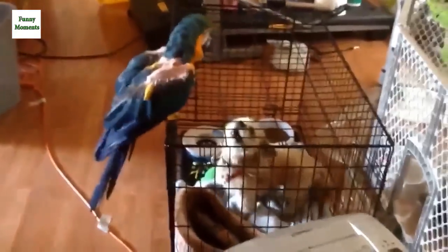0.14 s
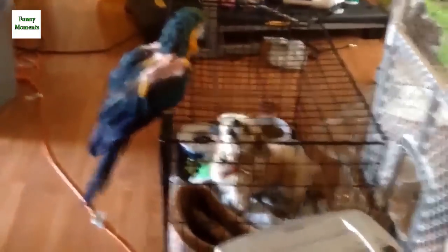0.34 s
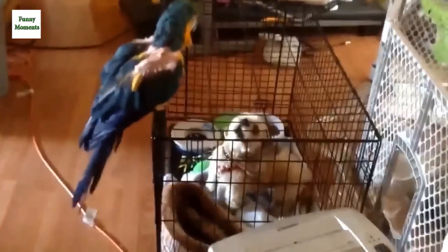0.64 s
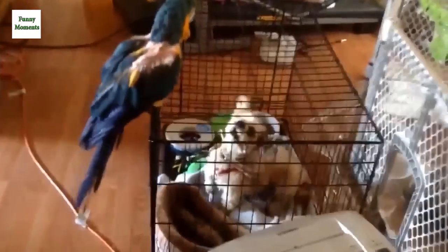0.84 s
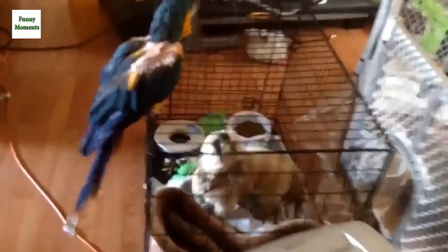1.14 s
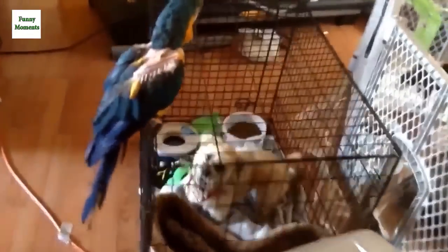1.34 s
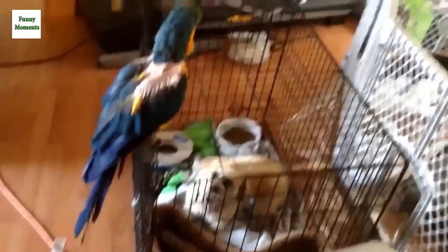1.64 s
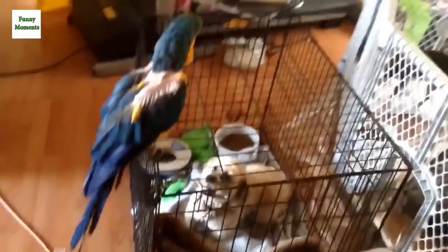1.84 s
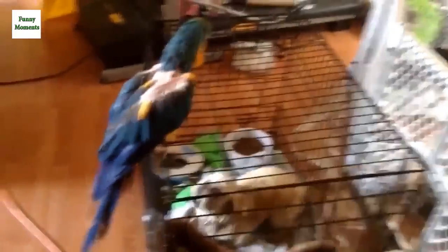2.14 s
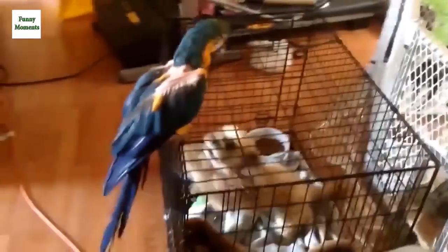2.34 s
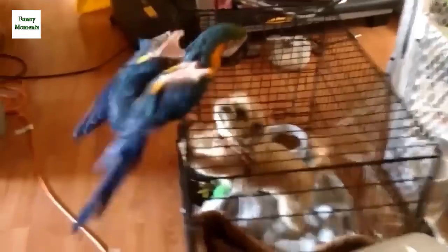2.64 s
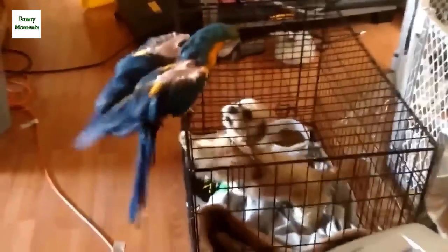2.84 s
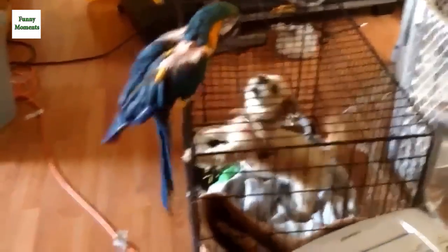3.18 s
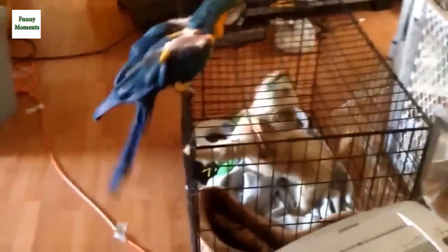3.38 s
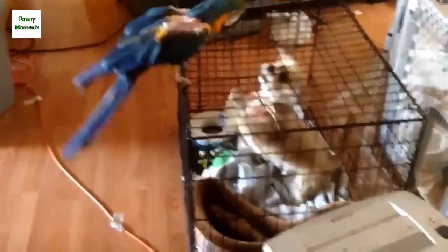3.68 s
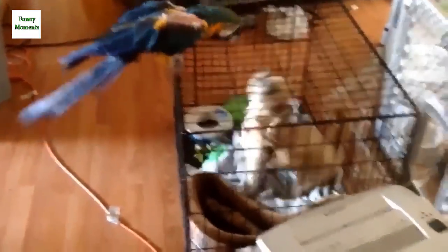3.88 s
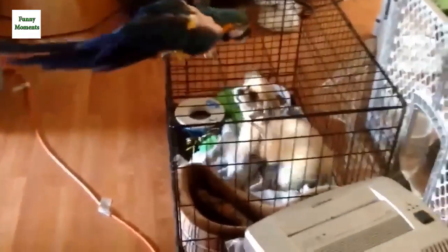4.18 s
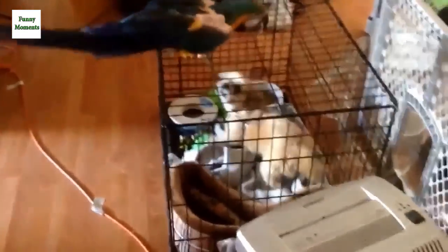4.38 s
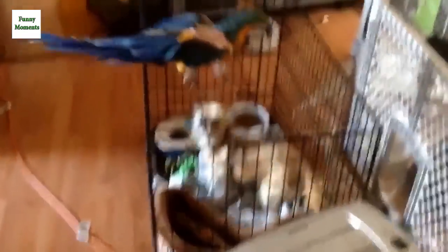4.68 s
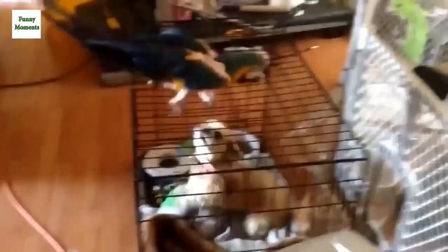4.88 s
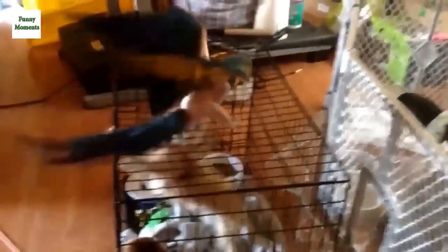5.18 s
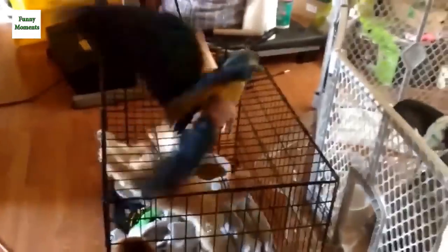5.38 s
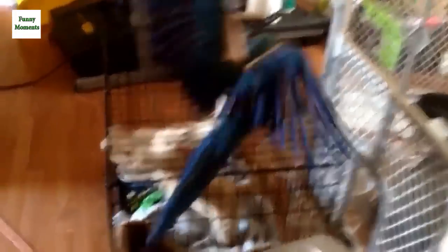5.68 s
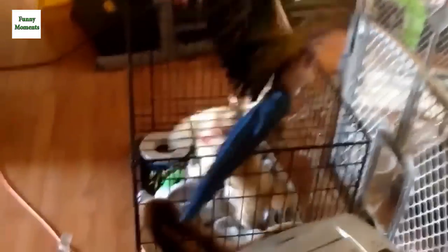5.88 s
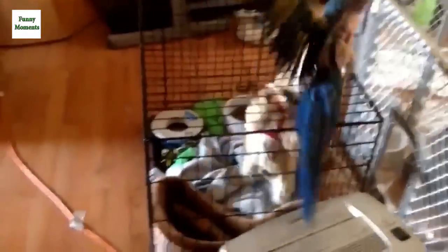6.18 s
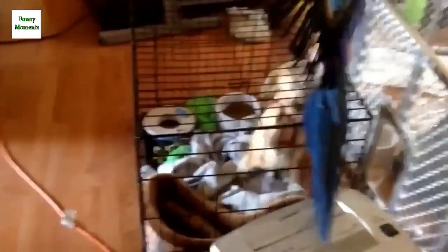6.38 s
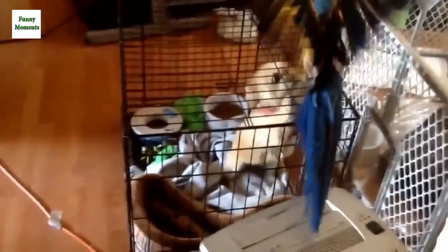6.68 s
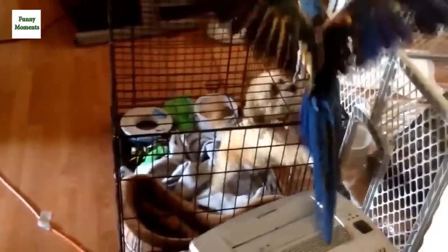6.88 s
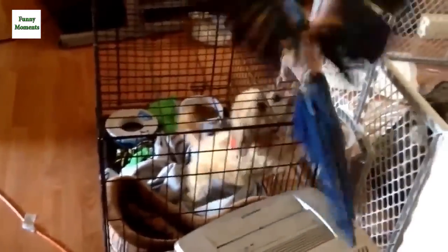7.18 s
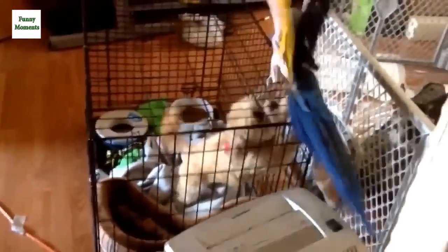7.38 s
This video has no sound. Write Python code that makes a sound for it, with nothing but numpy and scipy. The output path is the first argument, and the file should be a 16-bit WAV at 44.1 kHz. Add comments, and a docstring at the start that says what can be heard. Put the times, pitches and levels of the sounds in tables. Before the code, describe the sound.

Indoors, high, breathy barks from a small dog come about twice a second, pausing briefly for a single falling, raspy macaw squawk. The barks then give way to softer scrambling: crate wire clatters and jingles, feathers and bedding rustle, and the dog gives two low grumbles near the end. The room adds a short echo, and a small microphone cuts the bass and squashes the loudest barks.

```python
"""A small dog yaps from a wire crate in a hard-floored room; each bark is a puff of air and a yelp.
A macaw perched on the rim answers with one call that turns raspy and slides down.
Then both scramble about: bedding and feathers rustle, the wire knocks and jingles, and the dog
grumbles low with its mouth closed. Underneath lie a faint hum and a hiss that rises and dips.
A small microphone cuts the bass and squashes the loudest barks."""
import sys
import numpy as np
from scipy import signal
from scipy.fft import rfft, irfft
from scipy.io import wavfile
from scipy.ndimage import uniform_filter1d, minimum_filter1d

SR = 44100
rng = np.random.default_rng(int(sys.argv[2]) if len(sys.argv) > 2 else 0)


def to_wav(s):
    """Save 16-bit WAV."""
    ch = np.atleast_2d(s).T  # columns
    pcm = np.round(np.clip(ch, -1, 1) * 32767)  # PCM
    wavfile.write(sys.argv[1], SR, pcm.astype(np.int16))


N = 332073
CUTOFF_HZ = 15760   # where the treble ends


def dog():
    """The dog's voice: sharp barks, then low grumbles."""
    # each bark: (start [s], rise [s], fall [s], yelp pitch [Hz], pitch after the break [Hz],
    # crest [dB], level after the break [dB], first air [dB], full puff of air [dB],
    # mouth opening [dB], rasp [dB], roughness [0-1])
    barks = [(0.06, .042, 0.077, 1030, 690, -4, -14.5, -20.5, -23, 2, 7, .4),
             (0.52, 0.062, .06, 1113, 764, -3.5, -23, -20.5, -19, -0.5, 2.5, 0.47),
             (1.178, 0.047, 0.084, 886.7, 695, -5, -14, -44, -19.5, -5, 0, 0.45),
             (2.238, .062, 0.067, 1010, 674, -14.5, -13, -34.5, -12.5, 3, 1.5, 0.31),
             (2.55, .05, 0.086, 971.4, 734, -8.5, -14, -44, -20, 2.5, 0, 0.26),
             (3.02, .078, 0.051, 930, 823, -4.5, -21, -37, -20.5, -0.5, 3, 0.4),
             (3.45, 0.0739, 0.1037, 960, 979.3, -7.5, -15.5, -29.5, -20.5, 0, -0.5, 0.36),
             (3.872, .09, 0.047, 943, 817, -8.5, -17.5, -43, -22.5, -2.5, 1.5, 0.43)]
    # one list for each grumble: (time [s], pitch [Hz], level [dB], roughness [0-1])
    grumbles = [
        [(6.015, 266, -41, 0.42), (6.057, 264.7, -38, 0.41), (6.12, 327, -62, 0.54)],
        [(6.545, 402.3, -27.5, 0.08), (6.583, 375.4, -32.5, 0.28), (6.609, 283.4, -41.5, 0.53),
         (6.775, 289.1, -36.5, 0.32), (6.855, 319, -38, 0.36), (6.885, 353.8, -34, 0.17),
         (6.935, 336.7, -32.5, 0.26), (6.965, 348.3, -42, 0.57), (7.03, 288, -54, 0.6)],
    ]
    return sum(bark(*row) for row in barks) + sum(grumble(rows) for rows in grumbles)


def bark(start, rise, fall, yelp_hz, broken_hz, crest_db, broken_db,
         first_air_db, puff_db, open_db, rasp_db, rough):
    """Air puffs out, a yelp swells to its crest, then the pitch breaks, mostly downward, and falls."""
    # how the mouth shapes the tone: (frequency [Hz], level [dB])
    mouth = [(150, -43), (450, -16), (700, 2), (980, 10), (1450, -1), (2000, -7.5), (2500, -8),
             (2950, -24.5), (3600, -29), (5100, -25.5), (6100, -33), (15000, -30.5)]
    # the hiss of the breath: (frequency [Hz], level [dB per Hz])
    breath = [(88, -55), (150, -44.5), (205, -21), (510, -21), (573, -9), (782, -11), (1010, -2),
              (1430, -15.5), (1540, -4.5), (3930, -27), (4770, -29), (10400, -23), (13900, -33.5),
              (15600, -56.5)]
    crest = start + rise
    # five moments: a faint start, the puff, the crest, the break, the end
    times = [start, start + 0.4505 * rise, crest, crest + 0.018, crest + fall]
    hz = [0.92 * yelp_hz, yelp_hz, yelp_hz, broken_hz, 0.94 * broken_hz]
    level_db = np.array([crest_db - 28, crest_db - 13.5, crest_db, broken_db, broken_db - 11.5])
    air_db = np.array([first_air_db, puff_db, puff_db - 4, puff_db - 16.5, puff_db - 25])
    roughness = rough + np.array([0, 0, 0.1, 0.1, 0.2])
    half_pitch = np.full(len(times), 0.44)
    return voice(times, [hz, level_db, air_db - level_db, roughness, half_pitch],
                 open_mouth(mouth, open_db, rasp_db), open_mouth(breath, open_db, rasp_db),
                 wobble=0.0668, hoarse=1.0, flutter_db=2.5, fade_s=0.011)


def open_mouth(spectrum, open_db, rasp_db):
    """A wider mouth lifts the middle of the sound; rasp lifts the band above it."""
    return [(hz, db + open_db * (1300 < hz < 3100) + rasp_db * (3500 < hz < 5500)) for hz, db in spectrum]


def grumble(rows):
    """A closed-mouth murmur; the rougher it is, the more air and half pitch it carries."""
    # how the closed mouth muffles tone and breath: (frequency [Hz], level [dB])
    closed_mouth = [(88, -35), (150, -6), (318, 12), (566, 8.5), (1140, -1), (1910, -30), (3000, -31),
                    (3900, -13), (6600, -120)]
    times, hz, level_db, rough = np.transpose(rows)
    air_db = -25 + 56 * rough
    half_pitch = 0.56 * rough
    return voice(times, [hz, level_db, air_db, rough, half_pitch], closed_mouth, closed_mouth,
                 wobble=0.111, hoarse=0.84, flutter_db=2.0, fade_s=0.0032)


def macaw(slide_from_s=1.74, slide_to_s=1.95, slide_fade_s=0.057):
    """Returns the call, clear and then raspy, and two low tones that stay pure as it slides down."""
    # the course of the call: (time [s], pitch [Hz], level [dB])
    melody = [(1.35, 577, -48), (1.401, 639, -32), (1.5, 696.6, -27), (1.601, 720.7, -24.5),
              (1.7, 702.3, -21.5), (1.76, 632.5, -28.5), (1.81, 561.5, -27), (1.86, 394.5, -41.5),
              (1.916, 218, -53), (1.97, 180, -58)]
    # how the throat shapes the tone: (frequency [Hz], level [dB])
    throat = [(150, -4), (300, -4), (500, -7), (700, -8), (1000, -12), (1420, 3), (1650, 0), (2000, -8),
              (2450, -10), (2950, 2), (3500, -13), (3900, -18), (5000, -16), (6300, -20), (7000, -28),
              (9500, -24), (11000, -28), (13000, -33), (15500, -46)]
    # the raspy air: (frequency [Hz], level [dB per Hz])
    rasp = [(530, -45), (900, -15.5), (1470, -22.5), (1650, 3.5), (2000, -34.5), (2600, -19), (3000, 0),
            (3580, -9), (4600, -16), (5900, -13), (7000, -16), (9860, -15), (11000, -35), (14300, -40),
            (15500, -93.5)]
    # the pure tones, at the pitch and at twice the pitch: (starting level [dB], change [dB per s])
    pure_tones = [(-30.5, -100), (-25, -115)]
    times, hz, level_db = np.transpose(melody)
    air_db = np.interp(times, [1.64, 1.76], [-51, -8])   # air rushes in after the held note
    rough, half_pitch = np.full(len(times), 0.049), np.zeros(len(times))
    call = voice(times, [hz, level_db, air_db, rough, half_pitch], throat, rasp,
                 wobble=0.072, hoarse=0.065, flutter_db=3.0, fade_s=0.017)
    t = np.arange(N) / SR
    phase = 2 * np.pi * np.cumsum(np.interp(t, times, hz)) / SR
    since = np.clip(t, slide_from_s, slide_to_s) - slide_from_s
    fade = np.clip(np.minimum(t - slide_from_s, slide_to_s - t) / slide_fade_s, 0, 1)
    slide = sum(amp(db + db_per_s * since) * np.sin(k * phase)
                for k, (db, db_per_s) in enumerate(pure_tones, 1))
    return call, np.sqrt(2) * fade * slide


def voice(times, curves, throat, breath, wobble, hoarse, flutter_db, fade_s):
    """Vocal folds buzz and the throat shapes the tone; rough folds waver, skip cycles and leak air."""
    at = np.arange(round(times[0] * SR), round(times[-1] * SR))
    size = len(at)
    hz, level_db, air_db, rough, half_pitch = [np.interp(at / SR, times, curve) for curve in curves]
    waver = 1 + wobble * rough * drift(160.5, size) + 0.0044 * drift(16, size)
    phase = 2 * np.pi * np.cumsum(hz * waver) / SR
    multiples = np.arange(0.5, 40, 0.5)[:, None]
    gains = amp(at_hz(throat, multiples * hz)) * (multiples * hz < CUTOFF_HZ)
    gains[::2] *= half_pitch   # skipping every other cycle adds tones between the overtones
    gains /= np.sqrt(np.sum(gains ** 2, axis=0) / 2)
    flutters = np.array([drift(20.5, size) for _ in range(8)])   # overtones swell and fade unevenly
    gains *= amp(flutter_db * flutters[np.arange(len(gains)) // 2 % 8])
    tone = np.sum(gains * np.sin(multiples * phase + 2 * np.pi * rng.random(multiples.shape)), axis=0)
    tone *= amp(2.36 * rough * drift(120, size))   # strength stumbles from cycle to cycle
    tone = np.sqrt(1 - rough ** 2) * tone + hoarse * rough * shaped_noise(throat, size)
    air = amp(air_db) * shaped_noise(breath, size) * (1 + 0.18 * np.sin(phase))   # puffs with each cycle
    fade = np.clip(np.minimum(at - at[0], at[-1] - at) / (fade_s * SR), 0, 1)
    out = np.zeros(N)
    out[at] = amp(level_db) * fade * (tone + air)
    return out


def knocks(rattle_s=0.023, snap_s=0.0006, tick_s=0.0054, body_db=-12, tick_db=-10):
    """Loose wire panels snap and clatter briefly at each knock, with a bright tick on top."""
    # paws and claws hit the wire: (time [s], level [dB], extra level for the tick [dB])
    hits = [(0.468, -49, -16), (1.153, -51, -2), (1.952, -44, -20), (2.201, -45, -8), (4.111, -28.5, -27),
            (4.4, -25, -5), (4.432, -17.5, -20), (4.708, -39, -18), (4.827, -34, -18), (5.002, -27, -20),
            (5.138, -34, -18), (5.264, -31, 5), (5.309, -10.5, -20), (5.54, -20.5, -21), (6.18, -33, -4),
            (6.304, -43.5, 19), (6.483, -26, -17), (6.664, -27, -17), (7.295, -34, -12), (7.332, -54, -8),
            (7.393, -39, 5), (7.42, -37, 7), (7.465, -38, -1), (7.514, -43, -5)]
    # the clatter of the crate: (frequency [Hz], level [dB per Hz])
    crate = [(88, -40), (150, 7), (485, 5), (971, 8.5), (1150, 14), (1380, 7), (4020, 7.5), (6000, -7),
             (7800, -47), (13200, -120)]
    out, t = np.zeros(N), np.arange(SR // 10) / SR
    for start, level_db, treble_db in hits:
        body = amp(body_db) * shaped_noise(crate, len(t)) * (np.exp(-t / rattle_s) + np.exp(-t / snap_s))
        hiss = filtered(rng.standard_normal(len(t)), 2, 5000, "high")
        tick = amp(tick_db + treble_db) * hiss * np.exp(-t / tick_s)
        i = round(start * SR)
        out[i:i + len(t)] += amp(level_db) * (body + tick)[:N - i]
    return out


def wire_taps(gain_db=-8, spread_db=3.5):
    """Each tap sets the wire ringing, every tone with a strength of its own."""
    # a claw or beak taps the wire: (time [s], level [dB])
    taps = [(2.8938, -31), (4.11, -44), (5.54, -22.5), (5.7137, -30), (6.483, -25.5), (6.6644, -42)]
    # the tones of the wire: (frequency [Hz], level [dB], time to fade by 60 dB [s])
    tones = [(3450, -4, 0.059), (3730, -6.5, 0.094), (4260, -5.5, 0.057), (4950, -8, 0.059)]
    times, level_db = np.transpose(taps)
    luck_db = spread_db * rng.standard_normal((len(taps), len(tones)))
    out = np.zeros(N)
    for k, (hz, tone_db, ring_s) in enumerate(tones):
        clicks = np.zeros(N)
        clicks[np.round(times * SR).astype(int)] = amp(gain_db + level_db + tone_db + luck_db[:, k])
        out += ring(clicks, hz, ring_s)
    return out


def jingles(gain_db=-22, bounces_per_s=500, settle_s=0.024, spread_db=4.5, swing_db=-12, swing_s=0.16):
    """Small metal parts bounce unevenly and ring at each shake, then swing on more softly."""
    # each shake: (time [s], level [dB], extra for middle-sized parts [dB], extra for the largest [dB])
    shakes = [(2.4738, -45, -3, -18), (2.7296, -28, -12, -17), (2.822, -43, -9, -14), (3.3228, -49, 3, -14),
              (3.71, -49.5, -3, -2), (4.1026, -62, -6, -7), (4.1884, -45, -5, -13), (4.3866, -45, -3, -8),
              (4.4744, -40.5, 3, -16), (4.7302, -43, 6.5, -6), (4.9566, -38, -1, -20),
              (5.174, -38, -2, -19), (5.2704, -30, -11, -8), (5.409, -31.5, -1, -11),
              (5.6255, -26, -7, -24), (5.8022, -35, -4, -15), (5.839, -23, -10, -14),
              (6.0645, -32, -8, -20), (6.176, -31.5, -4.5, -28), (6.3071, -27, -2, -25),
              (6.5959, -42.5, 7.5, -14), (6.8613, -23.5, -10.5, -19), (6.975, -16.5, -13.5, -28),
              (7.0994, -43, -8, -2), (7.2505, -50, 14, -17), (7.5233, -24.5, -7, -16)]
    # the tones of the parts: (frequency [Hz], level [dB], time to fade by 60 dB [s])
    tones = [(7150, 0.5, 0.46), (8370, -2.5, 0.073), (8700, -10, 0.051), (8940, -6, 0.088),
             (9140, 1.5, 0.074), (9700, 4, 0.064), (10200, -8, 0.048), (10300, -11, .06),
             (11640, -16, 0.107), (12400, -21, 0.133), (12000, -6, 0.12), (12600, -0.5, 0.072),
             (12440, 3, 0.053), (13070, -6, 0.074), (13200, -21, 0.071), (13500, -22, 0.062),
             (13900, -7, 0.09), (14300, 0, .06)]
    t, out = np.arange(N) / SR, np.zeros(N)
    starts, level_db, middle_db, largest_db = np.transpose(shakes)
    luck_db = spread_db * rng.standard_normal((len(shakes), len(tones)))
    latest = np.searchsorted(starts, t) - 1
    since = np.abs(t - starts[latest])
    shaking = (latest >= 0) * (np.exp(-since / settle_s) + amp(swing_db) * np.exp(-since / swing_s))
    for k, (hz, tone_db, ring_s) in enumerate(tones):
        part_db = largest_db if hz < 7800 else middle_db if hz < 10900 else 0
        bounces = (rng.random(N) < bounces_per_s / SR) * rng.standard_normal(N)
        bounces[np.round(starts * SR).astype(int) + 1] = 1   # every shake opens with a firm hit
        strength = amp(gain_db + level_db + part_db + tone_db + luck_db[:, k])
        out += ring(bounces * shaking * strength[latest], hz, ring_s)
    return out


def hiss_and_rustle(patchy_db=2.0, grit_db=1.5):
    """Background hiss, later with rustling bedding and feathers: low, middle and bright noise flicker."""
    # a faint hiss that rises and dips, later joined by rustling: (time [s], level [dB], treble [dB])
    background = [(0, -62, -57), (.23, -63, -80), (.45, -69, -79), (.9, -73, -88.5), (1.2, -68, -78.5),
                  (1.94, -67, -65), (2.05, -66.5, -84), (2.3, -66.5, -89), (2.55, -51.5, -51),
                  (2.85, -45.5, -44), (3.3, -55, -71), (3.93, -63.5, -69), (4.3, -52.5, -55.5),
                  (4.65, -60, -71), (5.0, -56.5, -54.5), (5.7, -44.5, -42.5), (6.33, -57, -51.5),
                  (6.6, -44, -42.5), (6.8, -52, -46), (7.1, -45.5, -47.5), (7.53, -62.5, -52.5)]
    # the tone of the noise: (frequency [Hz], level [dB per Hz])
    spectrum = [(47, -98), (80, -10.5), (177, -6.5), (680, 2.5), (947, -2.5), (1760, -3.5), (2500, -6),
                (9400, -10.5), (10700, -11.5), (12000, -11.5), (15600, -11.5)]
    # scuffs of paws and sweeps of wings: (start [s], rise [s], middle [dB], low [dB], bright [dB])
    scuffs = [(.965, 0.017, -56.5, -70.5, -88.5), (1.08, .03, -66.5, -62.5, -87),
              (2.40, 0.024, -67, -62, -69), (4.394, 0.035, -42.5, -34, -60),
              (4.671, 0.052, -48, -42.5, -66), (4.82, 0.036, -56, -41.5, -55),
              (4.998, 0.0086, -49, -48, -62), (5.14, 0.037, -57, -41, -63), (5.29, 0.023, -29, -29, -55),
              (5.528, .012, -37, -45.5, -36.5), (5.6, 0.035, -55, -48, -36), (5.8, 0.063, -73, -47, -39),
              (6.015, 0.051, -47.5, -47, -41), (6.4, 0.052, -50, -47, -42.5), (6.85, .02, -48, -46, -41),
              (6.938, 0.056, -37, -41, -30.5), (7.33, 0.078, -66, -45, -54), (7.509, 0.016, -53, -48, -42)]
    # how fast a scuff fades: (low [dB per s], middle [dB per s], bright [dB per s])
    fades = [156, 92, 167]
    t, out = np.arange(N) / SR, np.zeros(N)
    times, *curves = np.transpose(background)
    level_db, treble_db = [np.interp(t, times, curve) for curve in curves]
    background_db = [level_db - 2, level_db, treble_db]
    for k, band_hz in enumerate([(60, 1500), (1500, 6000), (6000, 20000)]):
        power = amp(background_db[k]) ** 2
        for start, rise, middle_db, low_db, bright_db in scuffs:
            i = round(start * SR)
            since = t[i:i + SR // 2] - start
            shape = np.clip(since / rise, 0, 1) * amp(-fades[k] * np.maximum(since - rise, 0))
            power[i:i + SR // 2] += (amp([low_db, middle_db, bright_db][k]) * shape) ** 2
        noise = rms_one(filtered(shaped_noise(spectrum, N), 1, band_hz, "band"))
        flicker = amp(patchy_db * drift(11, N) + grit_db * drift(350, N))
        out += noise * np.sqrt(power) * flicker
    return out


def room(x, echo_db=-8.5, first_echo_s=0.0035):
    """The hard room returns dense echoes, which die away fastest in the top treble."""
    # how long the room rings: (frequency [Hz], time to fade by 60 dB [s])
    ring_times = [(200, 0.3), (600, 0.36), (1200, 0.42), (3000, 0.41), (7000, 0.32), (14000, 0.24)]
    t, edges_hz = np.arange(SR) / SR, 100 * 2 ** np.arange(0, 7.6, 0.5)
    echoes = np.zeros(SR)
    for low, high in zip(edges_hz, edges_hz[1:]):
        band = filtered(rng.standard_normal(SR), 2, [low, high], "band")
        echoes += band * amp(-60 * t / at_hz(ring_times, np.sqrt(low * high)))
    echoes *= np.clip(t / first_echo_s - 1, 0, 1)
    echoes /= np.sqrt(np.sum(echoes ** 2))
    return amp(echo_db) * signal.fftconvolve(x, echoes)[:N]


def hum():
    """A faint, wavering hum that swells briefly."""
    # the loudness of the hum: (time [s], level [dB])
    swell = [(0, -85), (1.5, -80.5), (1.8, -73.5), (2.25, -71), (2.6, -78.5), (7.53, -78)]
    level_db = np.interp(np.arange(N) / SR, *np.transpose(swell))
    return amp(level_db) * rms_one(ring(rng.standard_normal(N), hz=238, ring_s=0.22))


def amp(db):
    """Turns decibels into a gain."""
    return 10 ** (np.asarray(db) / 20)


def rms_one(x):
    """Scales a signal to an average strength (rms) of 1."""
    return x / np.sqrt(np.mean(x ** 2) + 1e-20)


def at_hz(points, hz):
    """Reads between a table's rows, giving each octave equal room."""
    known_hz, values = np.transpose(points)
    return np.interp(np.log(np.maximum(hz, 1)), np.log(known_hz), values)


def filtered(x, order, hz, kind):
    """Keeps the lows, the highs or a band; a higher order cuts more steeply."""
    return signal.sosfilt(signal.butter(order, hz, kind, fs=SR, output="sos"), x)


def drift(rate_hz, size):
    """A random wander of strength 1, up to about rate_hz fast."""
    r = np.exp(-2 * np.pi * rate_hz / SR)
    return rms_one(signal.lfilter([1], [1, -2 * r, r * r], rng.standard_normal(size + 4000))[4000:])


def shaped_noise(spectrum, size):
    """Noise of strength 1 with the given balance of lows and highs."""
    white = rfft(rng.standard_normal(size))
    hz = np.arange(len(white)) * SR / size
    return rms_one(irfft(white * amp(at_hz(spectrum, hz)), size))


def ring(clicks, hz, ring_s):
    """Each click starts a pure tone that fades by 60 dB in ring_s."""
    decay, step = amp(-60 / (ring_s * SR)), 2 * np.pi * hz / SR
    return signal.lfilter([0, np.sin(step)], [1, -2 * decay * np.cos(step), decay ** 2], clicks + 1e-18)


def scene():
    """Voices and crate noises fill the room; hiss, rustle and hum lie beneath."""
    call, slide = macaw()
    near = dog() + knocks() + wire_taps() + jingles() + slide
    # the macaw calls away from the microphone, so more of it comes by way of the walls
    to_walls = near + amp(6) * call
    return (near + call + hum() + room(to_walls) + hiss_and_rustle())[None]


def record(dry, ceiling=0.67):
    """The small microphone loses the bass and top treble, and turns the loudest peaks down."""
    x = filtered(dry, 6, 160.3, "high")
    x = filtered(x, 2, 13800, "low")
    needed_gain = ceiling / np.maximum(np.abs(x), ceiling)
    x = x * uniform_filter1d(minimum_filter1d(needed_gain, size=131), size=65)   # quick, smooth dips
    return signal.sosfilt(signal.cheby2(22, 80, CUTOFF_HZ + 100, fs=SR, output="sos"), x)


dry = scene()
out = record(dry)
to_wav(out)
```